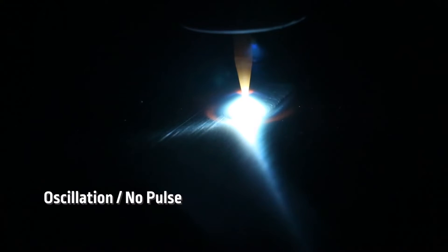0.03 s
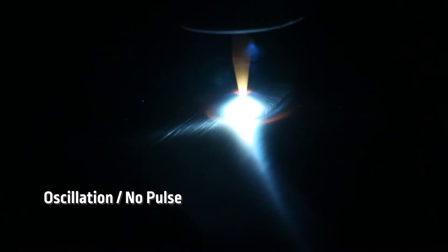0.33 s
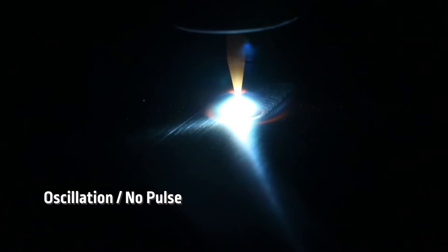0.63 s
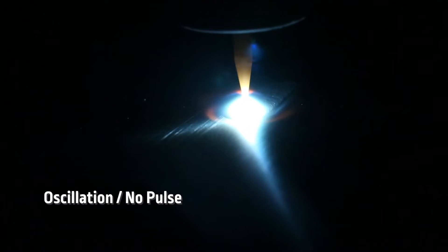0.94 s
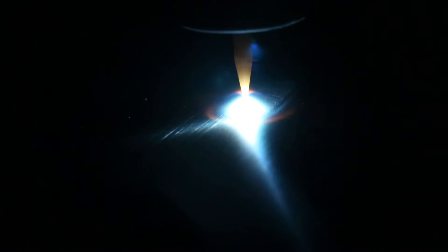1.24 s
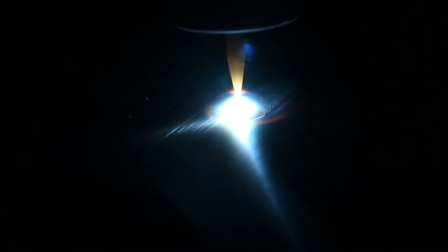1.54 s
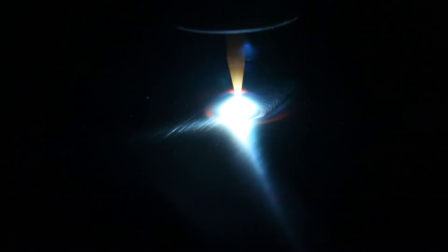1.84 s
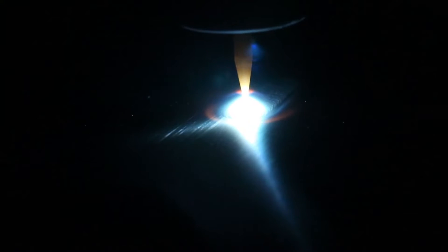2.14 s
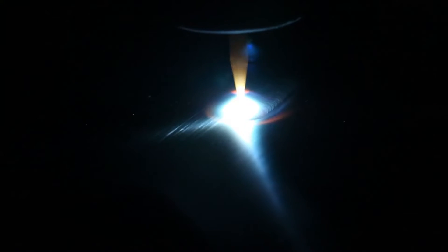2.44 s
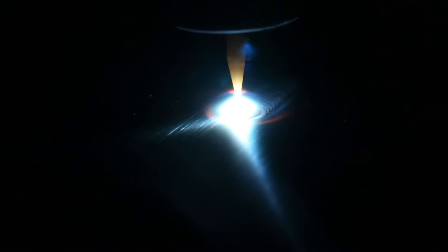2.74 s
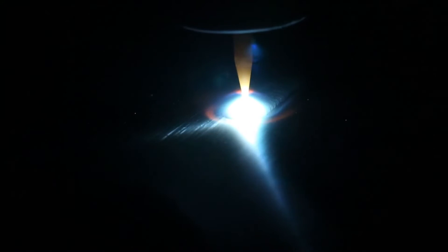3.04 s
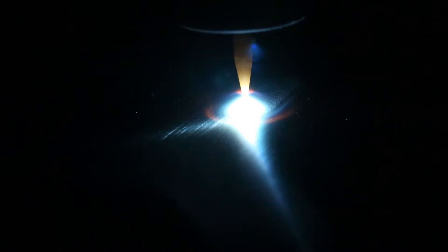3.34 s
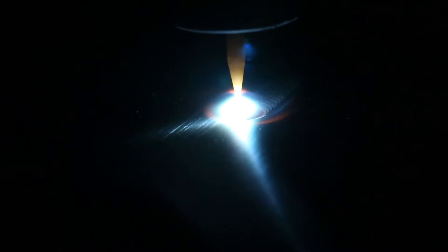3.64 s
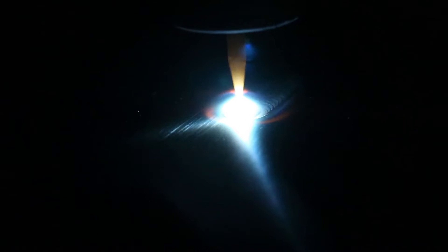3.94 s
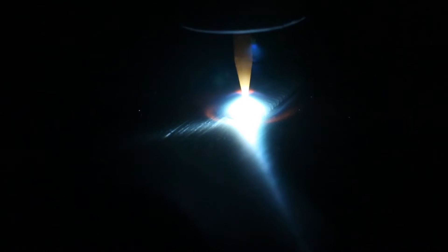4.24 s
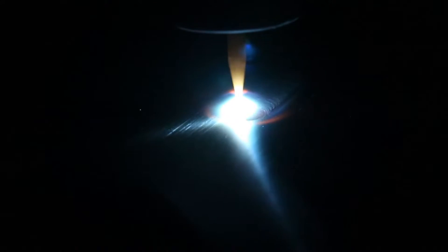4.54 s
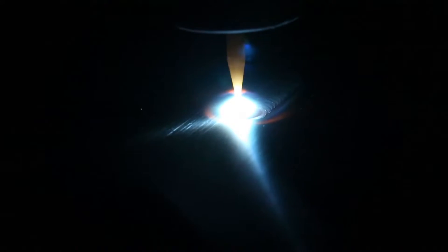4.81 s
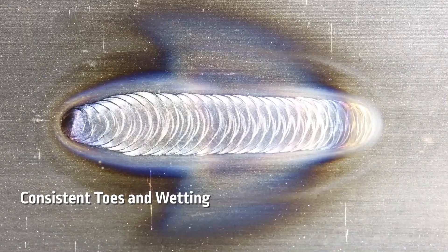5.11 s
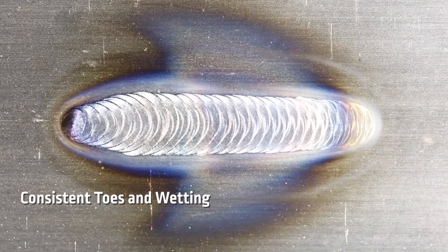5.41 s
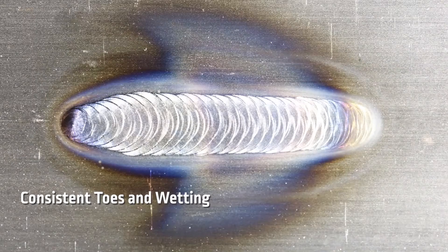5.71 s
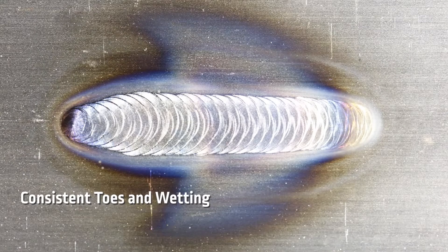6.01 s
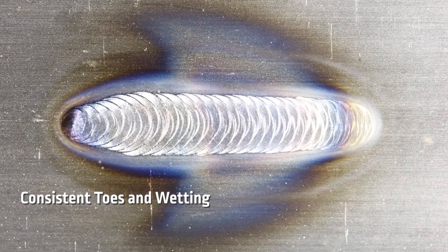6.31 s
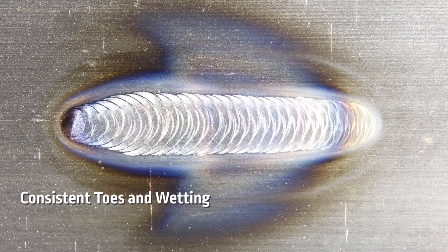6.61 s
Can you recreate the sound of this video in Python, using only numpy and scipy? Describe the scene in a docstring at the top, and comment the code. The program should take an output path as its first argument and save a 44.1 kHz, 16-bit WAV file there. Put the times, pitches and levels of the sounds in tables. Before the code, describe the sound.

A welding arc hisses steadily with a fine high buzz, over a faint machine hum and thin whines.

```python
"""A TIG welding arc burns steadily in a workshop, heard in mono at one fixed microphone.
Arc and shielding gas hiss, coloured by reflections between torch, plate and microphone;
the treble swings as the torch weaves and dulls as it travels along the seam.
Behind it the welding machine adds fan rumble, motor hum, thin whines from its power electronics,
and a whistle that swoops once in every mains cycle, heard as a fine buzz."""
import sys
import numpy as np
from scipy import signal
from scipy.fft import rfft, irfft
from scipy.io import wavfile

SR = 44100
rng = np.random.default_rng(int(sys.argv[2]) if len(sys.argv) > 2 else 0)


def persist_wave(psi):
    """Save psi, clipped to +-1, as 16-bit WAV."""
    counts = np.round(np.clip(psi, -1, 1) * 32767).astype(np.int16)
    wavfile.write(sys.argv[1], SR, np.atleast_2d(counts).T)


N = 298116
TIME_S, BINS_HZ = np.arange(N) / SR, np.fft.rfftfreq(N, 1 / SR)
TRAVEL_S = TIME_S - TIME_S.mean()  # zero as the torch passes the middle of the seam
WEAVE_S = 1.025  # one side-to-side weave of the torch


def gain_of(db):
    """Decibels to an amplitude factor."""
    return 10 ** (np.asarray(db) / 20)


def unit_rms(x):
    """Scales to rms 1."""
    return x / np.sqrt(np.mean(x ** 2) + 1e-20)


def level_at(spectrum, hz):
    """Reads (pitch_hz, level_db) points on a log-frequency axis."""
    pitch_hz, level_db = np.transpose(spectrum)
    return np.interp(np.log(hz + 1), np.log(pitch_hz + 1), level_db)


def filtered(x, db):
    """Filters by a gain in dB for each bin."""
    return irfft(rfft(x) * gain_of(db), N)


def noise(db):
    """Noise of rms 1 with the given spectral shape."""
    return unit_rms(filtered(rng.standard_normal(N), db))


def drift(rate_hz):
    """A random wander of rms 1 that rolls off above rate_hz."""
    lowpass = np.exp(-(BINS_HZ / rate_hz) ** 2) * (BINS_HZ > 0)
    return unit_rms(irfft(rfft(rng.standard_normal(N)) * lowpass, N))


def bell(x, centre, width):
    """A smooth bump of height 1."""
    return np.exp(-(2 * (x - centre) / width) ** 2)


def swing(period_s, peak_s):
    """A regular rise and fall between -1 and 1."""
    return np.cos(2 * np.pi * (TIME_S - peak_s) / period_s)


def tone(pitch_hz, level_db, wander_hz, rate_hz=14, flutter_db=2.03):
    """A sine that wavers in pitch and strength."""
    turns = np.cumsum(pitch_hz + wander_hz * drift(rate_hz)) / SR + rng.random()
    return np.sqrt(2) * gain_of(level_db + flutter_db * drift(rate_hz)) * np.sin(2 * np.pi * turns)


def workshop_reverb(x, t60_s=.3):
    """The short diffuse tail that the workshop returns to the microphone."""
    t = TIME_S[:SR // 2]
    tail = rng.standard_normal(len(t)) * gain_of(-60 * t / t60_s)
    return signal.fftconvolve(x, tail / np.linalg.norm(tail))[:N]


# Air stirred by the cooling fans: pitch_hz, relative_db
FAN_AIR = [(8, -31), (22, -14), (36, 0.5), (48, -12.5), (85, 1), (110, -1), (135, -0.5), (178, -3),
           (205, -11.5), (255, -16), (290, -13.5), (335, -7.5), (400, -17), (520, -34.5)]
# Hum of motors and fan blades: pitch_hz, level_db, wander_hz
FAN_TONES = [(66.2, -58, .1), (132.6, -60.5, .1), (268, -73, .4), (350, -69, 3), (464, -64, .6),
             (535.5, -68, .6), (803.3, -56.2, 1), (853.5, -61.2, 1.4), (928, -66, 1.5), (1071.5, -58, 1.5),
             (1339.5, -60.5, 1.2), (1362, -63, 4), (1392, -62, 2)]

def fans(air_db=-47.5, motor_hz=57.7, motor_db=-50):
    """In the background, fans rumble and hum over a deep motor that throbs about once a second."""
    throb_db = 2.5 * swing(period_s=1.03, peak_s=.7)
    motor = tone(motor_hz, motor_db + throb_db, wander_hz=.085, flutter_db=2.0)
    air = gain_of(air_db) * noise(level_at(FAN_AIR, BINS_HZ))
    return air + motor + sum(tone(*row) for row in FAN_TONES)


# Thin whines of the power electronics: pitch_hz, level_db, wander_hz
WHINE_TONES = [(2997, -64, 3), (3971, -57, 2), (4195, -64, 10), (5037, -62, 6), (6635, -65, 6),
               (7942, -62, 5), (9086, -69, 8), (9398, -76, 1), (9838, -75, 3), (13190, -69, 7),
               (13995, -67.5, 2), (14210, -68.5, 3), (15305, -72, 3)]
# Brief dips in the lead whine: middle_s, length_s, depth_db
WHINE_DIPS = [(3.48, .16, 13), (4.13, .24, 14), (4.58, .1, 8), (5.45, .22, 7), (6.3, .3, 14)]

def whines(lead_hz=12138, lead_start_db=-54.5, lead_fade_db_per_s=1.3, fade_db_per_s=.2):
    """The machine's power electronics whine and slowly weaken; one high lead fades faster and falters."""
    dips_db = sum(depth_db * bell(TIME_S, middle_s, length_s)
                  for middle_s, length_s, depth_db in WHINE_DIPS)
    lead_db = lead_start_db - lead_fade_db_per_s * TIME_S - dips_db
    lead = tone(lead_hz, lead_db, wander_hz=5, rate_hz=5, flutter_db=.6)
    fade_db = fade_db_per_s * TRAVEL_S
    return lead + sum(tone(hz, db - fade_db, wander, flutter_db=2.5) for hz, db, wander in WHINE_TONES)


# Peaks and hollows on the way to the microphone: pitch_hz, width_hz, gain_db
REFLECTIONS = [(1381, 113, 3.7), (1530, 70, -1.5), (1981, 90, 4.5), (2090, 60, -1.8), (2480, 90, 2.8),
               (2640, 90, 2.3), (2982, 144, 4.0), (3320, 90, -1.8), (3490, 347, 3.4), (3820, 140, -1.6),
               (4196, 54, 3.8), (4852, 341, -7.5), (5063, 172, 3.5), (5517, 200, -5.4), (5940, 93, -2.8),
               (6306, 158, -7.6), (6607, 280, 3.7), (7018, 272, -7.5), (7519, 237, 3.7), (8170, 330, -7),
               (8411, 197, 5.8), (9023, 384, 8.1), (9505, 361, -4.9), (9879, 712, 8.2), (10547, 144, -2.9),
               (10870, 631, 8.0), (12340, 200, -3), (12670, 220, 3), (13107, 504, 3.5), (14413, 351, -1.4),
               (15014, 459, 9.0)]

def reflections_db():
    """Reflections between torch, plate and microphone lift some pitches and hollow out others."""
    return sum(db * bell(BINS_HZ, hz, width_hz) for hz, width_hz, db in REFLECTIONS)


def torch_brightness_db(weave_db=.75, dulling_db_per_s=.5):
    """At the microphone the treble swings with each weave of the torch and dulls along the seam."""
    return weave_db * swing(WEAVE_S, peak_s=.22) - dulling_db_per_s * TRAVEL_S


# The whistle's dive and climb: cycle_fraction, pitch_hz
WHISTLE_PATH = [(0, 8200), (.12, 7600), (.17, 5700), (.22, 5250), (.3, 5650), (.35, 6300), (.4, 7300),
                (.46, 8500), (.55, 7700)]
# The whistle's strength at each pitch, before reflections: pitch_hz, level_db
WHISTLE_LEVELS = [(5400, -47.8), (6500, -49.8), (8000, -52.8), (11000, -58.5), (13800, -54.5), (16000, -62)]
# Sizzle that comes with the whistle: pitch_hz, relative_db
SIZZLE_SPECTRUM = [(3500, -30), (4800, -2), (6500, -2), (8000, -7), (10500, -9), (12300, -13), (13800, -3),
                   (15700, -11)]

def mains_buzz(mains_hz=59.49, on_fraction=.55, ramp_fraction=.06, sizzle_db=-54):
    """For about half of each mains cycle a rough whistle swoops, with its octave and a sizzle."""
    cycle = TIME_S * mains_hz % 1
    pitch_hz = np.interp(cycle, *np.transpose(WHISTLE_PATH))
    pitch_hz += 230 * drift(rate_hz=1210)  # trembles within a dive
    pitch_hz += 200 * drift(rate_hz=50)  # varies from dive to dive
    turns = np.cumsum(pitch_hz) / SR
    whistle = sum(gain_of(level_at(WHISTLE_LEVELS, k * pitch_hz)) * np.sin(2 * np.pi * k * turns)
                  for k in (1, 2))
    sizzle = gain_of(sizzle_db) * noise(level_at(SIZZLE_SPECTRUM, BINS_HZ))
    gate = np.clip(np.minimum(cycle, on_fraction - cycle) / ramp_fraction, 0, 1)
    strength_db = 1.2 * drift(rate_hz=45) + .35 * torch_brightness_db()
    bursts = (np.sqrt(2) * whistle + sizzle) * gate * gain_of(strength_db)
    return filtered(bursts, reflections_db())


# Ringing bands in the hiss: pitch_hz, width_hz, change_db_per_s
HISS_RINGS = [(1375, 170, 0.25), (1980, 190, -0.06), (2500, 210, 0.47)]

def seam_ringing(hiss, waver_db=.6):
    """Each ring in the hiss wavers a little and grows or fades as the torch travels."""
    out = hiss.copy()
    for hz, width_hz, change_db_per_s in HISS_RINGS:
        ring = irfft(rfft(hiss) * bell(BINS_HZ, hz, width_hz), N)
        change_db = change_db_per_s * TRAVEL_S + waver_db * drift(rate_hz=2)
        out += ring * (gain_of(change_db) - 1)
    return out


# Hiss of arc and shielding gas at the torch: pitch_hz, relative_db
ARC_SPECTRUM = [(450, -13.5), (580, -9.5), (750, -7), (1100, -7), (1450, -2.5), (2400, 1), (2800, -5),
                (4000, -5.5), (5500, -10.5), (7200, -18.5), (10000, -20), (12300, -27), (13800, -13),
                (15650, -25.5)]

def arc(level_db=-38.5, band_flicker_db=.57, flicker_db=.26, beaming_hz=9000):
    """In the foreground, gas hiss flickers with the arc; its treble follows the torch angle."""
    hiss = noise(level_at(ARC_SPECTRUM, BINS_HZ) + reflections_db())
    spectrum = rfft(seam_ringing(hiss))
    octave = np.log2(np.clip(BINS_HZ, 500, 16000) / 500)
    out = np.zeros(N)
    for k in range(11):  # overlapping bands, half an octave apart, each flickering on its own
        band = irfft(spectrum * np.maximum(1 - abs(2 * octave - k), 0), N)
        centre_hz = 500 * 2 ** (k / 2)
        beaming = centre_hz ** 2 / (centre_hz ** 2 + beaming_hz ** 2)
        out += band * gain_of(band_flicker_db * drift(rate_hz=15) + beaming * torch_brightness_db())
    pulse_db = .11 * swing(WEAVE_S / 3, peak_s=.09)  # three faint pulses in each weave
    return out * gain_of(level_db + pulse_db + flicker_db * drift(rate_hz=74))


def scene(room_db=-15):
    """Arc in front, machine behind, alike in both channels; only the buzz has a room tail."""
    buzz = mains_buzz()
    mix = arc() + buzz + gain_of(room_db) * workshop_reverb(buzz) + fans() + whines()
    return np.array([mix, mix])


# Three narrow equaliser notches cut from the whole sound: pitch_hz, width_hz
EQ_NOTCHES = [(450, 150), (7865, 260), (11752, 700)]
CUTOFF_HZ = 15715

def record(dry):
    """An equaliser cuts three narrow notches, then a low-pass shuts off the highest treble."""
    notches = [abs(BINS_HZ - hz) / np.hypot(BINS_HZ - hz, width_hz / 2) for hz, width_hz in EQ_NOTCHES]
    notched = irfft(rfft(dry) * np.prod(notches, axis=0), N)
    lowpass = signal.firwin(1023, CUTOFF_HZ, window=("kaiser", 9), fs=SR)
    return signal.oaconvolve(notched, lowpass[None], "same")


dry = scene()
out = record(dry)
persist_wave(out)
```